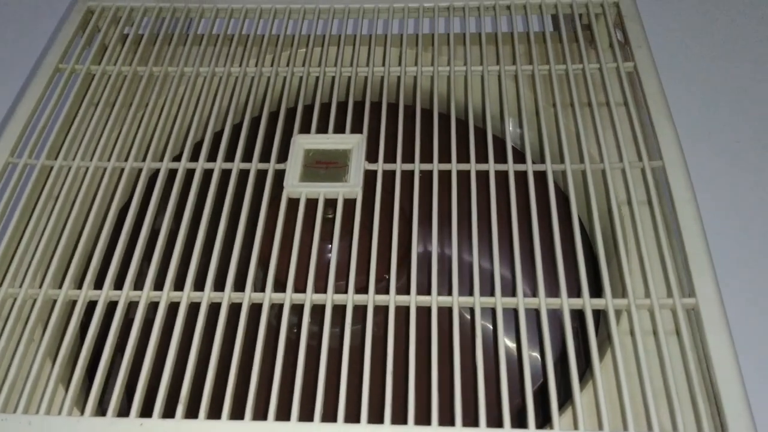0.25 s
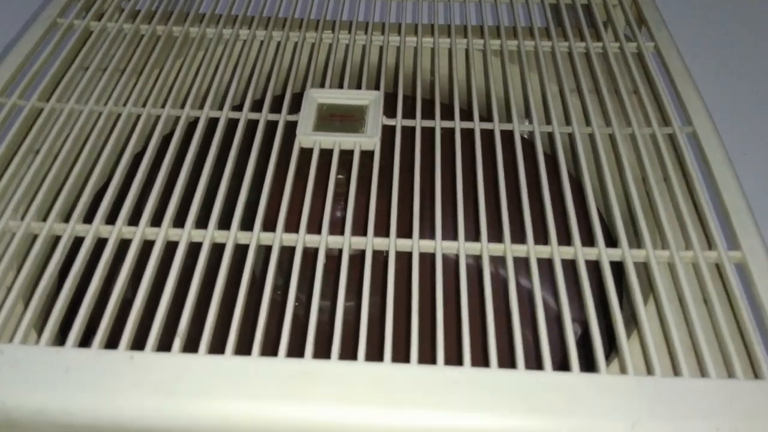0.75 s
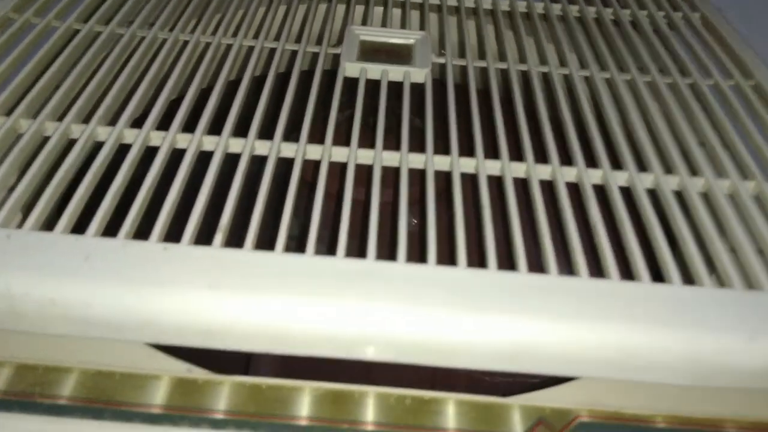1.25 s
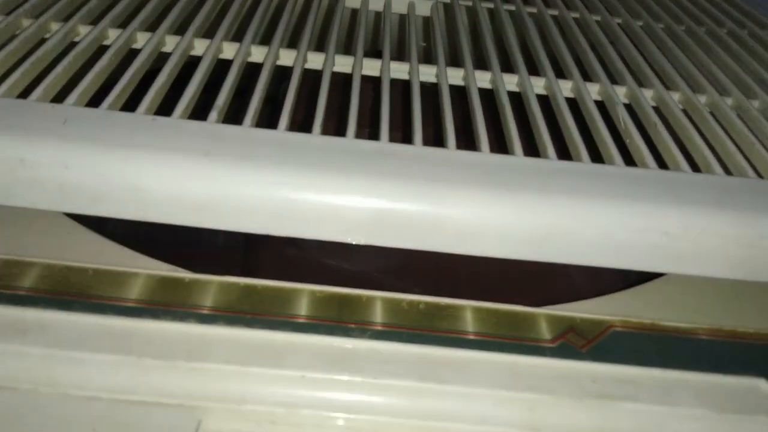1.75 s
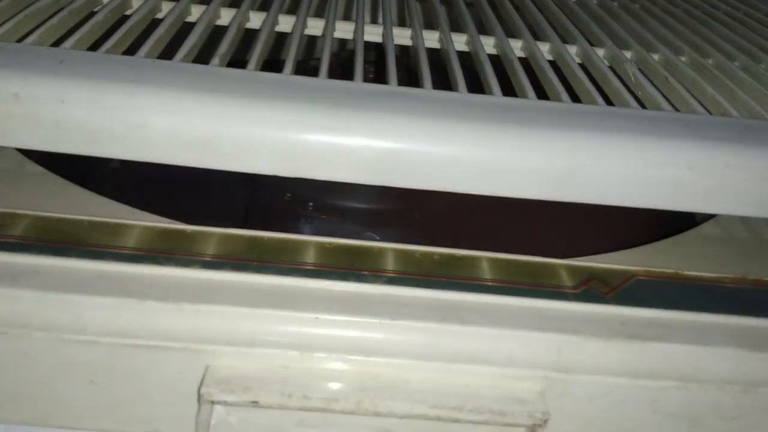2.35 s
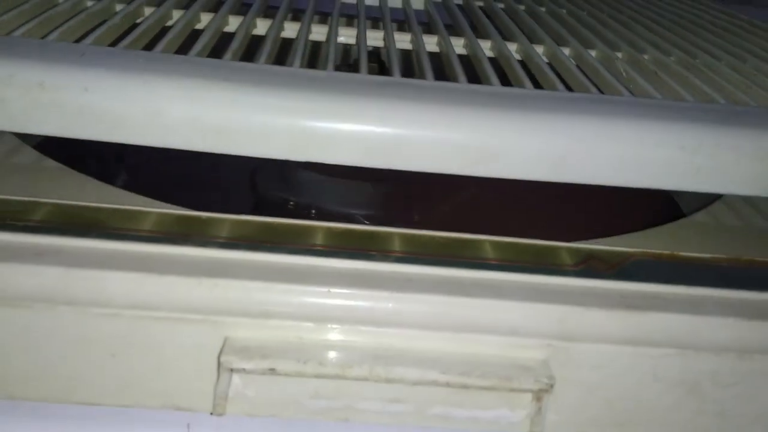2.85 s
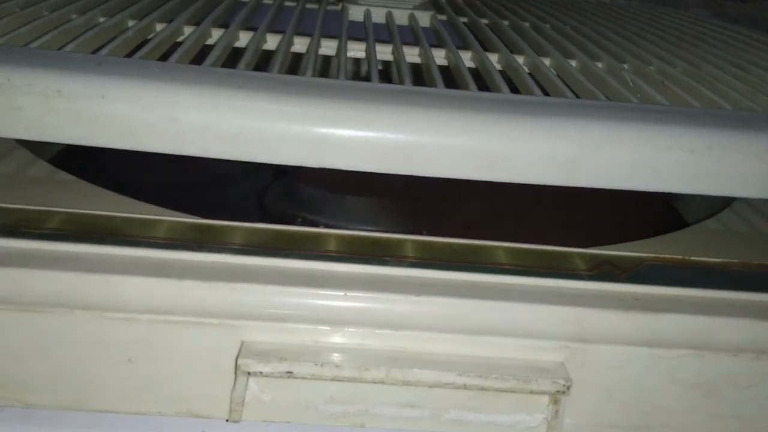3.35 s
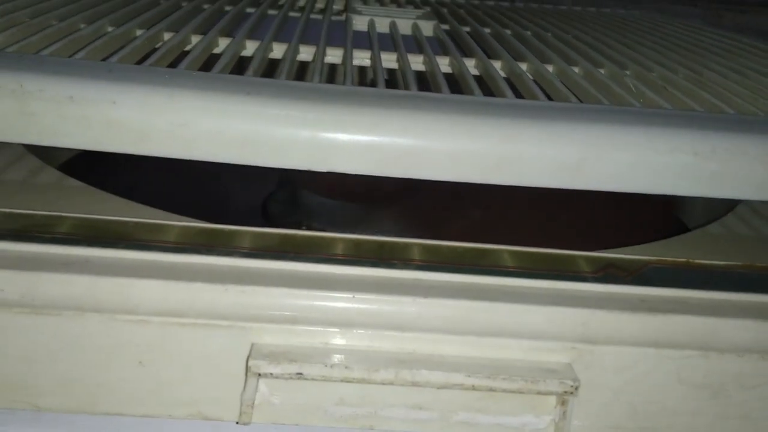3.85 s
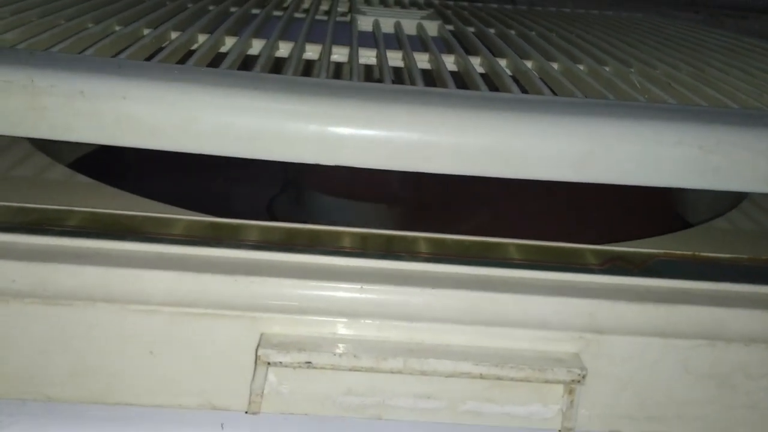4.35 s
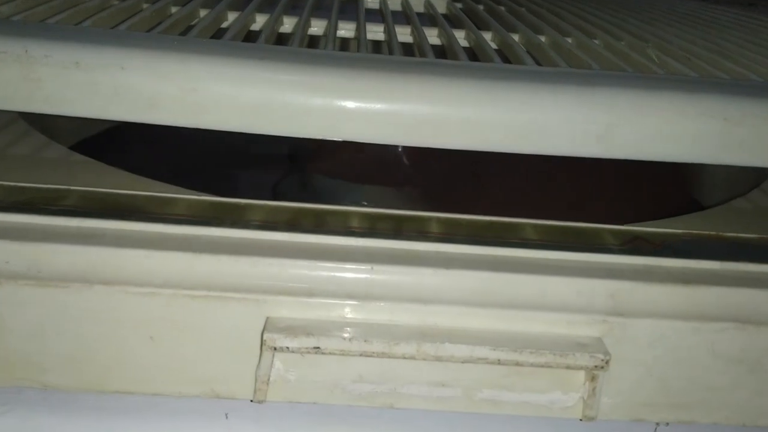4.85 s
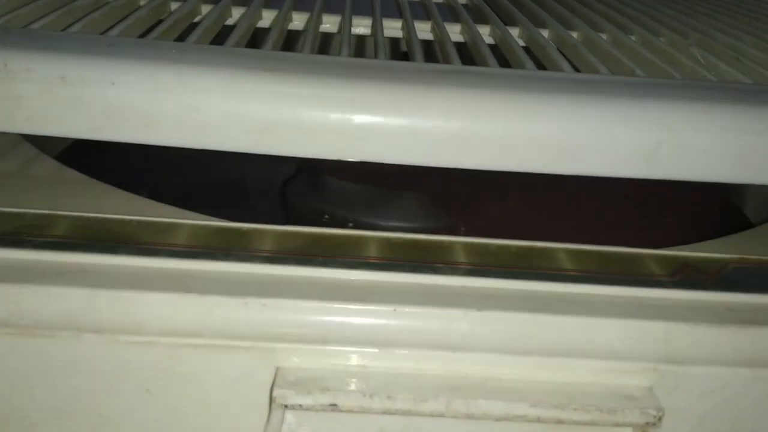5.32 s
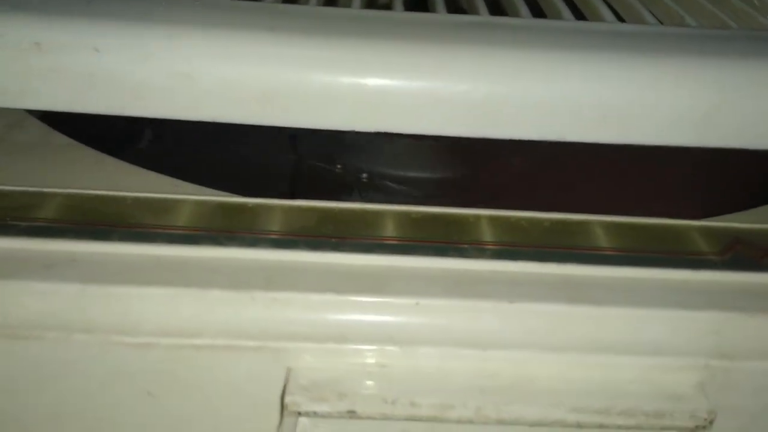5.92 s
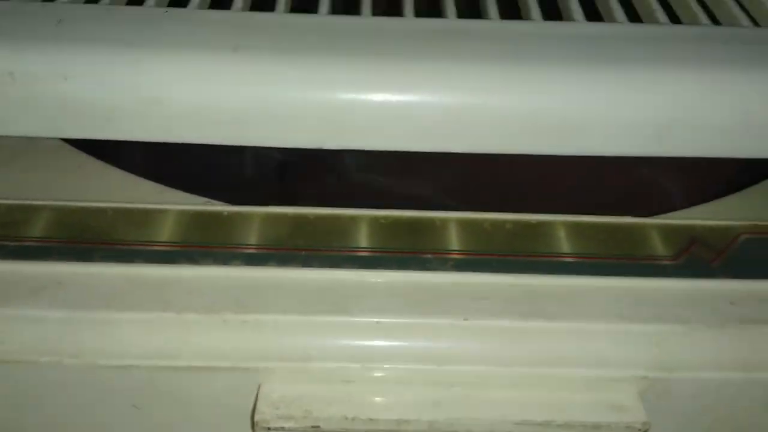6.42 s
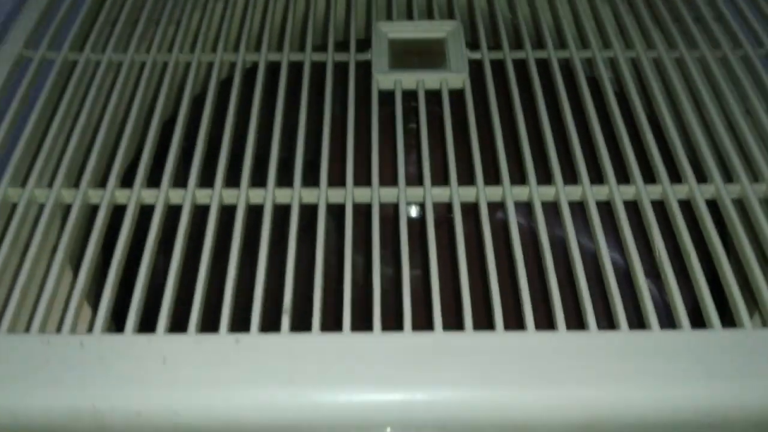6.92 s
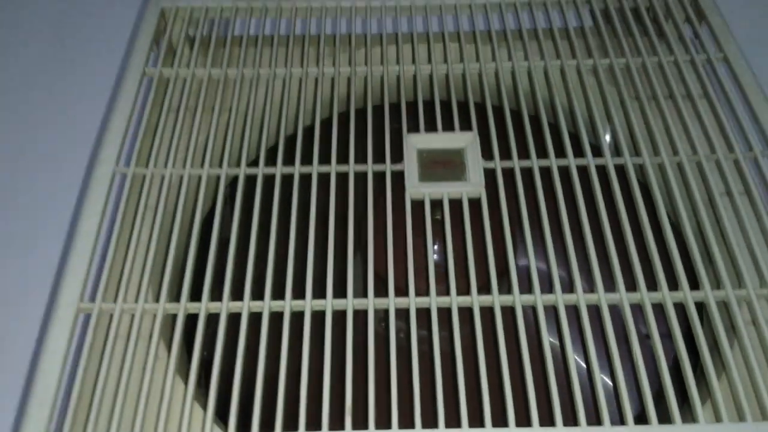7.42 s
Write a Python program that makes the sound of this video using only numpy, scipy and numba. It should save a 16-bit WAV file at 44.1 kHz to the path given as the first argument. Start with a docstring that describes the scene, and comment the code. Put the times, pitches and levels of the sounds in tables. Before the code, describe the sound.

Close stereo phone pickup of a running exhaust fan in a room: a deep constant buzz-like hum with wavering overtones, blended with dense, low-weighted air noise. The fan's speed hardly changes; only the colour shifts as the phone moves from grille to beneath the frame, gaining cavity resonance and losing brightness, then comes back. A soft, brief airy hiss brightens the final moments.

```python
"""A fan hums and rushes steadily: a wall exhaust fan, heard by a hand-held phone that faces its grille,
dips under the frame and comes back. Passing blades make the hum, a stack of sines locked to the rotor.
They also throb the rush of air, which is coloured noise; under the frame it is duller and boomier.
Near the end a short hiss, also noise, brightens the treble."""
import sys
import numpy as np
from scipy import signal
from scipy.fft import rfft, irfft, next_fast_len
from scipy.io import wavfile
from scipy.ndimage import uniform_filter1d
from numba import njit

SR = 44100
rng = np.random.default_rng(int(sys.argv[2]) if len(sys.argv) > 2 else 0)


def store_pcm(level_fs):
    """Save levels as 16-bit WAV."""
    pcm = np.round(np.clip(level_fs, -1, 1) * 32767).astype(np.int16)
    wavfile.write(sys.argv[1], SR, np.atleast_2d(pcm).T)


N = 338501
T = np.arange(N) / SR  # time in seconds
SIDES = np.array([[1], [-1]])  # left, right: splits a left-minus-right difference evenly


def undb(db):
    """Turn decibels into a gain."""
    return 10 ** (np.asarray(db) / 20)


def between(facing, shaded, hidden):
    """Slide a quantity from its facing value to its hidden value."""
    return facing + hidden * (shaded - facing)


def curves(table):
    """Join each column by straight lines in time."""
    seconds, *columns = np.transpose(table)
    return [np.interp(T, seconds, column) for column in columns]


def across(table, hz, axis=1):
    """Join one column of a spectrum by straight lines on a log-frequency axis."""
    columns = np.transpose(table)
    return np.interp(np.log(hz), np.log(columns[0]), columns[axis])


def walk(rate):
    """Wander at random: levels drawn `rate` times a second, smoothed twice."""
    hold = int(SR / rate)
    steps = np.repeat(rng.standard_normal(N // hold + 1), hold)
    return uniform_filter1d(uniform_filter1d(steps, hold), hold)[:N]


@njit
def band_pass(x, hz, width):
    """State-variable band-pass whose centre can move; its gain is 1 at the centre."""
    y, band, low = np.empty(len(x)), 0., 0.
    for i in range(len(x)):
        g, k = np.tan(np.pi * hz[i] / SR), width / hz[i]
        v = (band + g * (x[i] - low)) / (1 + g * (g + k))
        band, low, y[i] = 2 * v - band, low + 2 * g * v, k * v
    return y


def air(tone, db, gate, modes=(), axis=1):
    """Moving air: gated, coloured noise; the two ports agree in the bass and differ in the treble."""
    # The phone's microphone ports. Each row: frequency in Hz, level in dB.
    ports = [(20, -35.5), (32, -27.5), (45, -9), (60, 1), (1700, 0.5), (2200, -6.5), (2750, -16),
             (3200, -15.5), (3800, -19.5), (4600, -21), (6000, -26.5), (7900, -37.5), (9500, -28.5),
             (12000, -27.5), (13800, -32), (15600, -43.5)]
    # How alike left and right are. Each row: frequency in Hz, likeness facing (0-1), likeness hidden (0-1).
    likeness = [(40, 1, 0.98), (180, 0.98, 0.96), (400, 0.5, 0.59), (620, 0.87, 0.73), (900, 0.7, 0.18),
                (1150, 0.8, 0.8), (1390, 0.4, .2), (1840, 0.4, 0.2), (2330, 0.6, 0.6), (2780, 0, 0.1),
                (4000, 0.07, 0.04)]
    # Left minus right. Each row: frequency in Hz, difference facing in dB, difference hidden in dB.
    tilt = [(60, -2, -2.5), (200, 0, -2), (330, -2.5, -3), (470, -1, -4), (700, -1, -2), (1100, -2, 1),
            (1350, 0, -0.5), (2380, -1, 2), (3000, -4, -1), (3900, -2, -2.5), (4700, -4, -2.5),
            (6000, -1.5, 0.5), (7000, -1.5, -2.5), (8300, 0.5, -0.5), (11000, -3, -3), (13500, -2.5, -.5),
            (15000, -4.5, -3)]
    right_lag_s = (-1e-5, 5e-5)[axis - 1]  # how much later the right port hears it, facing and hidden
    size = next_fast_len(N)
    hz = np.maximum(np.arange(size // 2 + 1) * SR / size, 1)
    bumps = sum(peak_db / (1 + (2 * (hz - centre) / width) ** 2) for centre, width, peak_db in modes)
    colour = across(tone, hz) + across(ports, hz) + bumps
    alike = np.clip(across(likeness, hz, axis=axis), 0, 1)
    mid, side = rfft(gate * rng.standard_normal((2, N)), size)
    pair = np.sqrt(1 + alike) * mid + SIDES * np.sqrt(1 - alike) * side
    pair = pair * np.exp(1j * np.pi * SIDES * hz * right_lag_s)
    out = irfft(pair * undb(colour + SIDES * across(tilt, hz, axis=axis) / 2), size)[:, :N]
    return out * undb(db) / out.std()  # average (RMS) level set to db


def hiss():
    """A short treble hiss: noise with a quick rise, a short hold and a slower fall."""
    # Each row: time the peak is reached in seconds, peak level in dB.
    bursts = [(7.43, -57.5)]
    # Colour of the hiss. Each row: frequency in Hz, relative level in dB per Hz.
    hiss_tone = [(20, -89.5), (3000, -29), (6000, -4), (8000, -6), (11000, -3), (13000, -4), (16000, 3)]
    rise_db_s, hold_s, fall_db_s = 420, .03, 140  # dB per second, seconds, dB per second
    shape = 0
    for peak_s, db in bursts:
        rise = rise_db_s * np.maximum(peak_s - T, 0)
        fall = fall_db_s * np.maximum(T - peak_s - hold_s, 0)
        shape = shape + undb(db - rise - fall)
    return shape * air(hiss_tone, 0, 1)


def rush(phase, hidden, hollow_hz):
    """Turbulence swells as each blade passes the struts; the frame shades and colours it."""
    # Air rush facing the grille. Each row: frequency in Hz, relative level in dB per Hz.
    facing_tone = [(60, -11), (75, -11), (95, -13.5), (140, -14), (175, -16.5), (210, -19), (300, -23),
                   (421, -25.5), (600, -23.5), (800, -23), (1000, -25), (1250, -26), (1600, -29.5),
                   (2300, -29), (16000, -31)]
    # Air rush under the frame. Each row: frequency in Hz, relative level in dB per Hz.
    hidden_tone = [(60, -8.5), (80, -13), (105, -9), (150, -16.5), (240, -16.5), (300, -21.5), (420, -22.5),
                   (550, -25.5), (800, -26), (1050, -28.5), (1500, -37), (2300, -32.5), (6000, -31.5),
                   (16000, -32)]
    # Colour of the open grille. Each row: centre in Hz, width in Hz, boost or cut in dB.
    grille = [(3750, 500, -2), (4440, 700, 2), (7600, 1500, -4), (13000, 2500, 1)]
    # Cavity under the frame. Each row: centre in Hz, width in Hz, boost in dB.
    cavity = [(171, 33, 4), (335, 64, 3), (530, 30, 5), (615, 25, 2.5), (723, 55, 5), (1320, 200, 6.5),
              (1567, 140, 4.5), (2100, 480, 3)]
    throb_lag = 1.9  # radians behind the blade tone
    gate = 1 + between(.17, .12, hidden) * np.cos(phase - throb_lag)  # throb depths 0-1
    gust_db, gust_rate = 0.26, 8  # small swells and sags: dB per unit of walk, draws a second
    gate = gate * undb(gust_db * walk(gust_rate))
    facing = np.sqrt(1 - hidden) * air(facing_tone, -32, gate, grille)
    shaded = np.sqrt(hidden) * air(hidden_tone, -31, gate, cavity, axis=2)

    hollow_depth, hollow_width_hz = between(0.3, 0.65, hidden), 125.  # depth as a share taken away
    right_up = .07  # the right port's hollow sits this share higher when fully hidden
    # A shallower hollow above the first glides with it.
    second_ratio, second_depth, second_width_hz = 1.48, 0.31, 150.
    # A lifted band: its gain has one part for facing and one that is strongest when half hidden.
    lift_hz, lift_width_hz = between(1550, 2070, hidden), 240.
    lift_gain = 0.14 * (1 - hidden) + 0.37 * np.sin(np.pi * hidden)
    out = []
    for x, hz in zip(facing + shaded, (hollow_hz, hollow_hz * (1 + right_up * hidden))):
        hollow = hollow_depth * band_pass(x, hz, hollow_width_hz)
        second_hollow = second_depth * band_pass(x, second_ratio * hz, second_width_hz)
        lift = lift_gain * band_pass(x, lift_hz, lift_width_hz)
        out.append(x - hollow + lift - second_hollow)
    return np.array(out)


def clumped(pair):
    """Eddies make patches of the rush swell or clump on their own, alike in both ports."""
    # Each row: centre in Hz, width in Hz, depth (0-1), random draws a second.
    eddies = [(60, 41, 0.22, 2.94), (176, 90, 0.09, 5.16), (290, 90, 0.19, 3), (520, 120, 0.17, 40),
              (745, 240, 0.09, 90), (1210, 360, 0.15, 90), (2000, 1400, 0.12, 90)]
    out = pair
    for hz, width, depth, rate in eddies:
        patch = np.array([band_pass(x, np.full(N, 1. * hz), 1. * width) for x in pair])
        out = out + depth * walk(rate) * patch
    return out


def hum(phase, hidden, tone_db):
    """Blade passing tone and overtones, sines locked to the rotor; uneven inflow makes overtones waver."""
    # Overtones as the phone moves through the fan's near field.
    # Each row: time in seconds, then levels in dB of multiples 2 to 8 of the blade rate.
    overtone_db = [(0, -44, -63, -53, -59, -60, -60, -55), (.35, -44, -63, -55, -48, -66, -60, -55),
                   (.7, -51.5, -60, -54, -52.5, -58, -58, -58), (1.1, -43, -61, -52, -44, -55, -60, -66),
                   (1.3, -43.5, -52, -49, -57, -52, -56, -66), (1.6, -44, -49, -50, -63, -57, -57, -67),
                   (2.4, -43.5, -52, -47.5, -58, -52, -56, -69), (2.8, -40, -52, -46, -57, -57, -59, -67),
                   (3.9, -44, -46.5, -45.5, -61, -60, -64, -65), (4.5, -41.5, -49, -44, -63, -58, -64, -63),
                   (5.6, -39, -45.5, -45.5, -56.5, -60, -60, -68),
                   (6.1, -38.5, -46.5, -43.5, -61, -55, -63, -72),
                   (6.3, -47, -44.5, -47, -64, -54, -59, -71),
                   (6.65, -42.5, -53, -43.5, -61, -62, -57, -69), (6.9, -46, -50, -51, -63, -60, -58, -65),
                   (7.2, -43, -48.5, -55, -54, -59, -61, -62), (7.5, -43, -49.5, -52.5, -43, -66, -64, -60)]
    # Left minus right, one row for each multiple 2 to 8. Each row: facing in dB, hidden in dB.
    overtone_pan = [(-3, -4.5), (-3, -6.5), (-1, -7), (-1, -1), (0, 5.5), (3.5, 2), (-2, -0.5)]
    # A blade's pressure pulse leans forward and its top overtones trail (both in radians).
    lead, spread = 1.25, .28
    tone_waver_db, overtone_waver_db, overtone_waver_rad = 0.4, 1.4, .15  # per unit of walk
    tone_pan_db = between(-1.5, -1.6, hidden)  # left minus right
    out = undb(tone_db + tone_waver_db * walk(6) + SIDES * tone_pan_db / 2) * np.cos(phase)
    for k, (db, pan_db) in enumerate(zip(curves(overtone_db), overtone_pan), 1):
        gain = undb(db + overtone_waver_db * walk(5) + SIDES * between(*pan_db, hidden) / 2)
        offset = lead * k - spread * k ** 2 + overtone_waver_rad * walk(5)
        out = out + gain * np.cos((k + 1) * phase + offset)
    return np.sqrt(2) * out  # the levels are RMS, so peaks are higher


def scene():
    """Add the hum, the rush and the short hiss as the phone moves."""
    # The phone's path. Each row: time in seconds, share hidden behind the frame (0-1),
    # centre of the hollow in Hz, level of the blade tone in dB, gain of the rush in dB.
    phone = [(0, 0.04, 830, -29, 0.5), (.8, 0.01, 890, -28, 0.3), (1.3, 0.39, 890, -27.5, 0),
             (1.8, 0.63, 925, -27.5, 0), (2.5, 0.8, 966, -28, -0.3), (3.5, 1, 1023, -28, -0.2),
             (4.6, 0.98, 1060, -28, -0.2), (5.5, 1, 965, -28.5, 0.5), (6.1, 0.84, 910, -27, 0.15),
             (6.5, 0.82, 900, -27.5, 1), (6.9, 0.16, 910, -27.5, 0.25), (7.3, 0.01, 880, -28, .1),
             (7.68, 0.02, 840, -32.5, 0.7)]
    # How often blades pass. Each row: time in seconds, blade rate in Hz.
    blade_rate = [(0, 117.35), (1.7, 117.2), (3, 117.3), (4.3, 117.45), (5.7, 117.3), (6.6, 117.0),
                  (7.68, 117.1)]
    hidden, hollow_hz, tone_db, rush_db = curves(phone)
    hidden = np.clip(hidden, 0, 1)
    phase = 2 * np.pi * np.cumsum(curves(blade_rate)[0]) / SR
    moving_air = undb(rush_db) * clumped(rush(phase, hidden, hollow_hz))
    return hum(phase, hidden, tone_db) + moving_air + hiss()


def record(dry):
    """The sound fades in over the first few milliseconds, and the phone cuts the top of the treble."""
    open_s, top_hz = .004, 15600
    opening = np.sin(np.pi / 2 * np.minimum(T / open_s, 1)) ** 2
    low_pass = signal.ellip(10, .2, 80, top_hz, fs=SR, output="sos")
    return signal.sosfilt(low_pass, dry * opening)


dry = scene()
out = record(dry)
store_pcm(out)
```